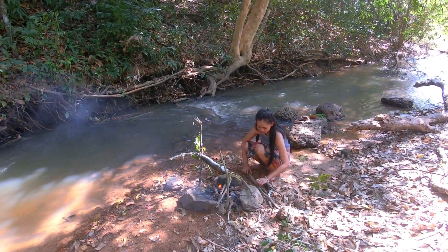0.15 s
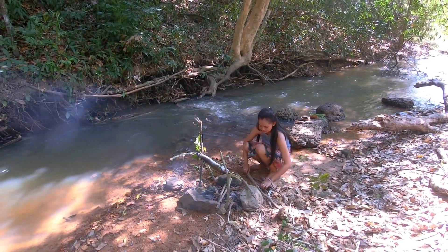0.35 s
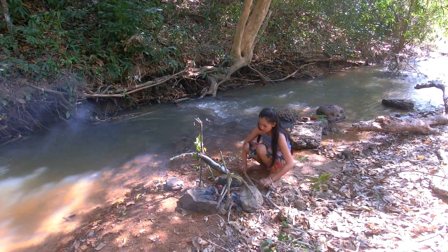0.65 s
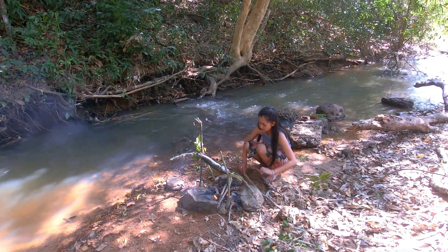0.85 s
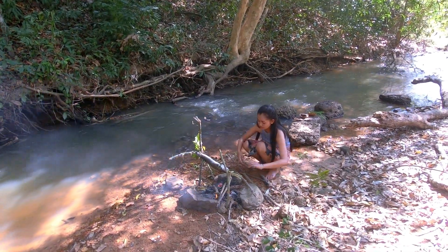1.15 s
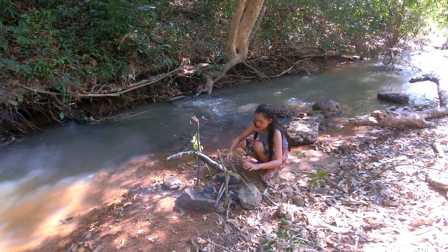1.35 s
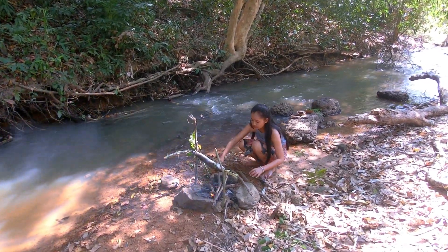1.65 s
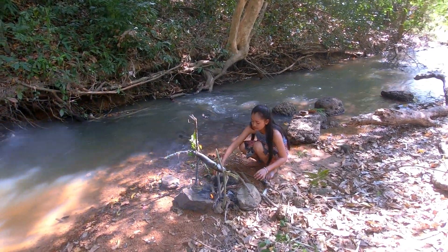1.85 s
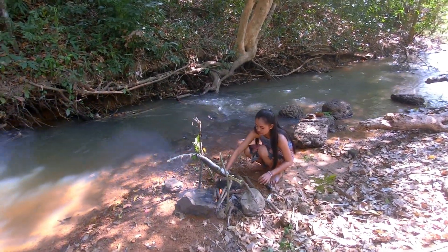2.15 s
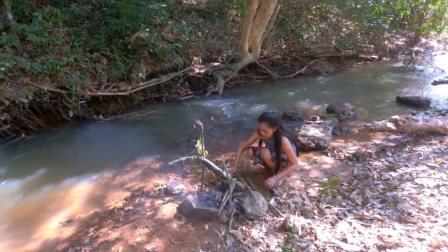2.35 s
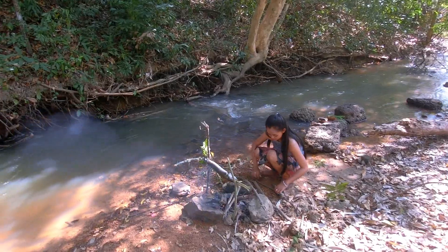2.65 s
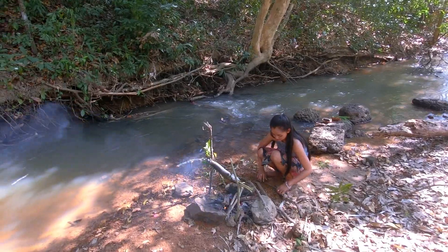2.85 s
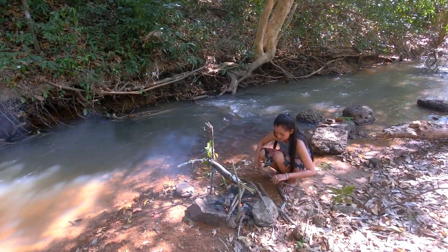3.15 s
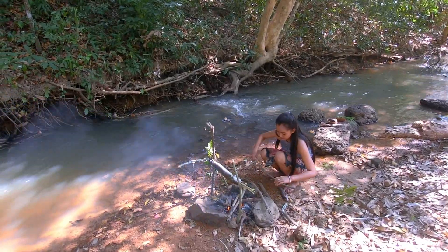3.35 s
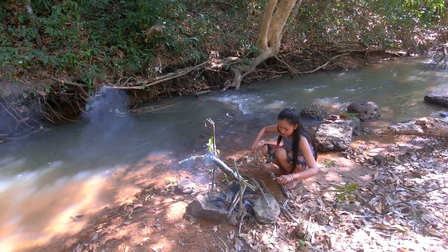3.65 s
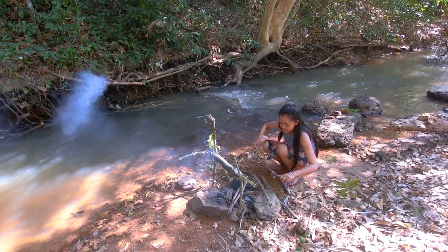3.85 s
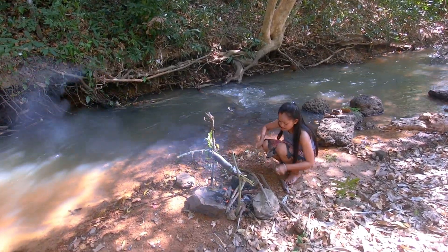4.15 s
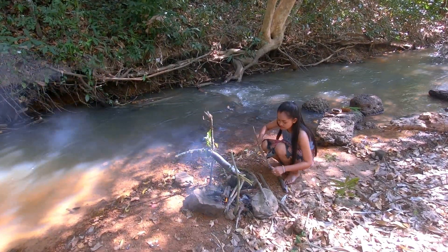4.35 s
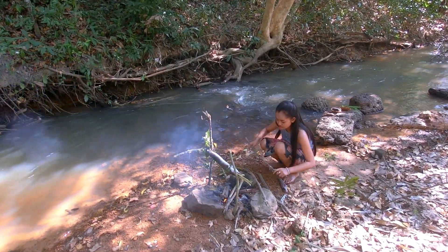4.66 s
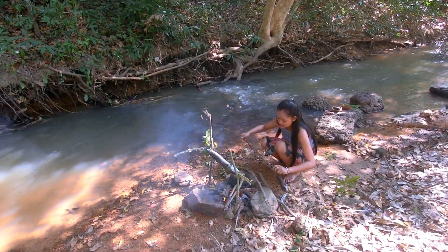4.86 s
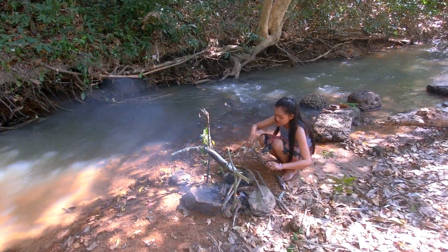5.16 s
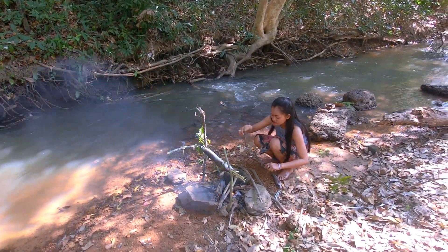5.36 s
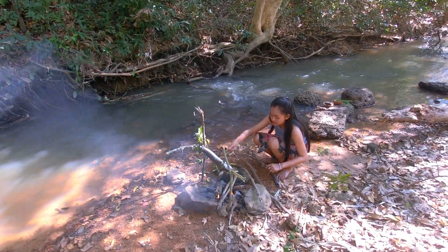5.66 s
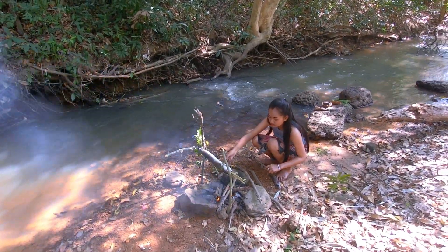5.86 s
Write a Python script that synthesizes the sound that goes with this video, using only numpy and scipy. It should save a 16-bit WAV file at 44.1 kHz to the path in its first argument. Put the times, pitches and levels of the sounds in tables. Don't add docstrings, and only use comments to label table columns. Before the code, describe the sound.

Forest stream bank, open air, stereo microphone near a small fire. Continuous turbulent water with gurgles and bright drips; a metallic-thin cicada buzz that repeatedly dips in pitch and rises again; distant insects hissing behind. Dry crackles get busier after three seconds, leading to a sharp crack and a louder double snap with a bright echo, then the background drops and slowly recovers. Soft low wind buffets.

```python
import sys
import numpy as np
from scipy import signal
from scipy.fft import rfft, irfft
from scipy.io import wavfile
from scipy.ndimage import uniform_filter1d

SR = 44100
rng = np.random.default_rng(int(sys.argv[2]) if len(sys.argv) > 2 else 0)


def boost(x):
    u = np.asarray(x, float) / 20
    return 10 ** u


def generate_wav(signal):
    frames = np.transpose(np.atleast_2d(signal))
    scaled = np.clip(frames, -1, 1) * 32767
    pcm = np.round(scaled).astype(np.int16)
    wavfile.write(sys.argv[1], SR, pcm)


N = 265041
TIME = np.arange(N) / SR

# (frequency [Hz], level [dB per Hz])
CREEK_SPECTRUM = [(120, -5), (228, -8), (410, -10), (825, -2), (1800, -2.5), (2900, -5), (4700, -7.5),
                  (9900, -11), (13000, -11), (17000, -22)]


def evened(x):
    return x / np.sqrt(np.mean(x ** 2) + 1e-20)


def read(points, hz):
    f, value = np.transpose(points)
    return np.interp(np.log(hz + 1), np.log(f + 1), value)


def add(mix, start_s, sound, pan_db):
    part = mix[:, round(start_s * SR):][:, :sound.shape[-1]]
    gain = boost(np.array([[pan_db], [-pan_db]]) / 2)
    part += (gain * sound)[:, :part.shape[1]]


def resonate(x, hz, width_hz):
    turn = np.exp(2j * np.pi * np.cumsum(hz * np.ones(N)) / SR)
    r = np.exp(-np.pi * width_hz / SR)
    return 2 * (turn * signal.lfilter([1 - r], [1, -r], x / turn)).real


def drift(rate_hz):
    return evened(np.interp(TIME * rate_hz, np.arange(1000), rng.standard_normal(1000)))


def ramp(from_s, length_s):
    return np.clip((TIME - from_s) / length_s, 0, 1)


def coloured(x, colour, size=1024):
    hz, t, z = signal.stft(x, SR, nperseg=size)
    z = z * boost(read(colour, hz))[:, None]
    return signal.istft(z, nperseg=size)[1][..., :N]


def echoed(x):
    # (frequency [Hz], t60 [s])
    banks_t60 = [(1000, 0.072), (3000, 0.11), (6000, 0.692), (12000, 0.41)]
    length = SR // 2
    sparse = (rng.random((2, length)) < .06) * (np.arange(length) > 150)
    taps = rng.choice([-1., 1.], (2, length)) * sparse
    hz, t, z = signal.stft(taps, SR, nperseg=256)
    decay = boost(-60 * t / read(banks_t60, hz)[:, None])
    tail = signal.istft(z * decay, nperseg=256)[1]
    return signal.fftconvolve(x, tail / np.linalg.norm(tail[0]), axes=1)[:, :N]


def creek():
    level_db = -43.5 + 0.19 * drift(3.26)
    return boost(level_db) * (creek_wash() + boost(-5.5) * bubble_swarm()) + single_bubbles()


def creek_wash():
    # (frequency [Hz], left-right likeness [0-1])
    likeness = [(100, 0.23), (270, 0.64), (450, 0.57), (740, 1), (1220, 0.79), (2000, 0.93), (3300, 0.63),
                (5500, 0.1), (11000, 0.21), (15000, 0.13)]
    # (frequency [Hz], left lead [rad])
    left_lead = [(100, .01), (1120, 0.63), (2670, 1), (3450, 0.21), (5000, 0.91), (10000, .1)]
    frames, hz = N // 128 + 5, np.fft.rfftfreq(512, 1 / SR)
    a, b, c, d, patches = rng.standard_normal((frames, 257, 5)).T
    patches = uniform_filter1d(patches, size=5, axis=0)
    patches = evened(uniform_filter1d(patches, size=16, axis=1))
    flicker = evened(uniform_filter1d(rng.standard_normal(frames), size=6))
    flicker = flicker * np.clip(hz / 9000, 0, 1)[:, None]
    same = np.clip(read(likeness, hz), -1, 1)[:, None]
    left = a + 1j * b
    right = same * left + np.sqrt(1 - same ** 2) * (c + 1j * d)
    right = right * np.exp(-1j * read(left_lead, hz))[:, None]
    level_db = read(CREEK_SPECTRUM, hz)[:, None] + 1.57 * patches + 0.83 * flicker
    z = np.array([left, boost(1.2) * right]) * boost(level_db)
    return evened(signal.istft(z, nperseg=512, noverlap=384)[1][:, :N])


def bubble(hz, turns, rise):
    u = np.arange(int(3 * turns * SR / hz)) * hz / SR / turns
    ring = np.sin(2 * np.pi * turns * (u + rise * u ** 2))
    return ring * np.exp(-2 * u) * np.minimum(u * 8, 1) * 1.348


def bubble_swarm():
    swarm = np.zeros((2, N))
    for hz in np.geomspace(330, 2600, num=18):
        per_s = 40 * boost(7 * drift(9))
        size_db = 3.5 * np.minimum(rng.exponential(1, N), 3)
        train = boost(size_db) * (rng.random(N) < per_s / SR)
        pan_db, turns = rng.standard_normal(2)
        sound = signal.oaconvolve(train, bubble(hz, 9 + turns, 0.0967))[:N]
        add(swarm, 0, boost(read(CREEK_SPECTRUM, hz)) * sound, 2.0 * pan_db - 0.5)
    return evened(swarm)


def single_bubbles():
    # (time [s], peak [dB], pitch [Hz])
    large_bubbles = [(0.124, -28.5, 1210), (0.139, -32, 544), (0.296, -33.5, 574), (0.234, -26, 1010),
                     (0.269, -31.5, 950), (0.349, -29.5, 870), (0.494, -33, 424), (0.64, -24.5, 1410),
                     (1.44, -31, 734), (0.867, -30.5, 600), (0.912, -36, 262), (1.905, -32, 1590),
                     (2.097, -31.5, 990), (2.533, -29.5, 940), (3.519, -38, 267), (3.367, -33, 450),
                     (2.693, -31, 1690), (2.749, -32, 1060), (2.845, -27.5, 820), (3.149, -29, 1090),
                     (3.428, -30, 1380), (3.509, -32, 1300), (3.778, -31, 580), (4.302, -31, 624),
                     (4.53, -40, 290), (4.779, -33, 349), (5.397, -29, 790), (5.45, -28.5, 840),
                     (5.844, -27.5, 805), (5.974, -33, 342.4)]
    # (time [s], peak [dB], pitch [Hz], pitch rise [fraction])
    bright_drips = [(0.2354, -30, 2735, 0.11), (0.4424, -29, 3700, 0.09), (1.427, -34.5, 2760, 0.1),
                    (1.9964, -33, 2580, 0.082), (2.1445, -28.5, 2510, 0.077), (3.2512, -30.5, 3420, 0.084),
                    (3.3667, -31, 2300, 0.086), (3.482, -30, 4750, 0.019), (3.4848, -31, 4730, .01),
                    (3.4885, -33, 4600, .01), (3.4915, -31, 4650, .01), (3.5018, -28, 4300, .02),
                    (3.862, -32, 4100, .05), (3.4982, -29, 4260, 0.05), (3.8496, -24.5, 3550, 0.15),
                    (4.4039, -33, 2040, 0.11), (4.653, -29, 3370, 0.11), (5.3185, -34, 2460, 0.092)]
    out = np.zeros((2, N))
    for s, db, hz in large_bubbles:
        add(out, s, boost(db - 5.5) * bubble(hz, 7.1, 0.0506), -1.)
    for s, db, hz, rise in bright_drips:
        add(out, s, boost(db - 2) * bubble(hz * (1 - rise), 7.8, rise), -1.5)
    return out


def cicada():
    # (level [dB], shift [click periods])
    ribs = [
        (1.5, 0),
        (-1, .004),
        (-5, -.003),
        (-7, .006),
        (-2.5, -.002),
    ]
    body_hz, clicks_per_s, effort_db = cicada_phrase()
    turns = np.cumsum(clicks_per_s + 1.1 * drift(7)) / SR
    count = np.arange(1, int(turns[-1]))
    rib_db, shift = np.transpose(ribs)[:, count % len(ribs)]
    chance = rng.standard_normal((3000, 2))[:len(count)]
    slack = np.clip((7700 - np.interp(count, turns, body_hz)) / 1400, 0, 1)
    jitter = (.003 + .011 * slack) * chance[:, 0]
    at = np.interp(count + shift + jitter, turns, np.arange(N))
    near = np.round(at).astype(int)[:, None] + np.arange(-8, 9)
    size = boost(rib_db + 2. * chance[:, 1])
    pulse = np.sinc(near - at[:, None]) * np.hanning(19)[1:-1]
    clicks = np.zeros(N + 9)
    np.add.at(clicks, near, size[:, None] * pulse)
    ring = clicks[:N]
    for _ in range(3):
        ring = resonate(ring, body_hz, 1400)
    ring = signal.sosfilt(signal.butter(6, 5650 / SR * 2, "high", output="sos"), ring)
    voice = evened(ring) * boost(effort_db + 0.63 * drift(25.4))
    hz, delay_s = np.fft.rfftfreq(N, 1 / SR), 62e-6
    late = irfft(rfft(voice) * np.exp(-2j * np.pi * hz * delay_s), N)
    pair = np.array([boost(0.2) * late, boost(2.0) * voice])
    return pair + boost(-4) * echoed(pair)


def cicada_phrase():
    # (from [s], to [s], lowest body pitch [Hz], slack click rate [1/s])
    dips = [
        (.5, 1.201, 6220, 445),
        (2.04, 2.72, 6500, 442),
        (3.57, 4.251, 6600, 437),
        (5.17, 5.879, 6430, 450),
    ]
    # (time [s], level [dB])
    effort_points = [(0, -45), (.5, -46.5), (.9, -45), (1.2, -45), (1.9, -45.5), (2.2, -47), (2.8, -45.5),
                     (3.05, -42.5), (3.55, -47.5), (4.1, -47), (4.3, -45.5), (4.6, -47), (5.15, -47),
                     (5.35, -50), (5.68, -44), (5.78, -50), (5.9, -43.5), (6.02, -44)]
    slacken_s, tighten_s, dip_db = 0.23, 0.17, -2.
    taut_hz, sag_hz_per_s, first_taut_s = 8070, 400, -0.301
    taut_per_s, rate_sag_per_s2, quicken_s, rate_lag_s = 421.1, 2.2, .18, .07
    taut_s = TIME - first_taut_s
    for start, end, low_hz, slack_per_s in dips:
        taut_s = np.where(TIME > (start + end) / 2, np.maximum(TIME - end, 0), taut_s)
    body_hz = taut_hz - sag_hz_per_s * taut_s
    clicks_per_s = taut_per_s - rate_sag_per_s2 * taut_s
    effort_db = np.interp(TIME, *np.transpose(effort_points))
    for start, end, low_hz, slack_per_s in dips:
        slack = ramp(start, slacken_s) - ramp(end - tighten_s, tighten_s)
        quick = ramp(start, quicken_s) - ramp(end + rate_lag_s - quicken_s, quicken_s)
        body_hz = body_hz + slack * (low_hz - body_hz)
        clicks_per_s = clicks_per_s + quick * (slack_per_s - clicks_per_s)
        effort_db = effort_db + dip_db * slack
    return body_hz, clicks_per_s, effort_db


def band(low_hz, high_hz):
    return signal.butter(2, [low_hz / SR * 2, high_hz / SR * 2], "band")


def fire():
    return fire_crackle() + fire_snaps()


def fire_crackle():
    # (time [s], peak [dB], left-right [dB], low part [dB])
    ticks = [(0.1411, -29, -0.5, -5), (0.6632, -26, -6, -2), (0.9118, -28, -4, 8),
             (1.1134, -38, -0.5, -8.0), (1.276, -28.5, -0.5, 7), (1.6177, -22, -4, 0),
             (2.0368, -34, 0.0, -8.0), (2.2717, -45, 0.0, -8.0), (2.4159, -40, -1.0, -11),
             (2.6469, -29, 0.0, -0.5), (2.9352, -27, -1.5, -9), (3.0789, -39, -1.0, -8.0),
             (3.1774, -26, 0.0, -8.0), (3.3354, -22.5, -0.5, 2.5), (3.4995, -25, -2.0, 10.5),
             (3.5818, -41, 0.0, -8.0), (3.7134, -23.5, -4, 5), (3.7893, -32, -1.5, -3),
             (3.8086, -30, -3.5, -3), (3.9625, -25, 0.0, 0), (4.7122, -47, -1.0, -11),
             (5.1173, -36, 0.0, -8.0), (5.2924, -35, 0.0, -8.0), (5.5343, -41, -0.5, -8.0),
             (5.5947, -42, -1.0, -8.0), (3.73, -32, -1, 5), (5.7254, -29, -0.5, -5),
             (5.8366, -30, -1.0, -8.0)]
    out, t = np.zeros((2, N)), TIME[:2000]
    bright, body = band(7000, 14500), band(2000, 9000)
    envelope = boost(-60 * t / 0.0065) + boost(-8 - 60 * t / 0.027)
    envelope = envelope * np.minimum(t / 0.00029, 1)
    for s, db, pan_db, low_db in ticks:
        burst = rng.standard_normal(2000) * envelope
        tick = signal.lfilter(*bright, burst) + boost(low_db - 5.5) * signal.lfilter(*body, burst)
        add(out, s + .0008, boost(db - 2.5) * tick, pan_db)
    size_db = 4 * np.minimum(rng.exponential(1, N), 2.5)
    fizz = boost(size_db) * (rng.random(N) < 90 / SR) * rng.choice([-1, 1], N)
    return out + boost(-31.5) * signal.lfilter(*bright, fizz)


def fire_snaps():
    snaps = [
        ((3.8316, -4, -3, -36, -20, .0002), [(3000, -25, .003), (5200, -21, .003), (7600, -7, .003), (9600, -1, .0025), (11600, -1, .0025), (13900, -4, .002)]),
        ((4.0552, 5.5, -1, -15, -15, .0005), [(1700, -27, .008), (2750, -17, .011), (3600, -15, .009), (4700, -16, .008), (5400, -13, .006), (6500, -5, .006), (8000, -4, .005), (8900, -10, .004), (9800, 2, .0045), (10800, -8, .003), (12300, -9, .003), (14400, -12, .004)]),
        ((4.0671, 3.5, -1, -15, -14, .0006), [(1500, -25, .006), (3500, -16, .005), (5500, -12, .005), (7500, -1, .006), (8300, -7, .005), (9400, -4, .004), (11800, -17, .035), (12100, -1, .006), (14300, -9, .006)]),
    ]
    # (frequency [Hz], level [dB])
    echo_colour = [(500, -38), (2000, 1), (4000, -3), (7000, -2.5), (12000, 3.5), (15000, -6),
                   (18000, -20.5)]
    out, cracks, t = np.zeros((2, N)), np.zeros((2, N)), TIME[:2000]
    splinters = band(4500, 15000)
    for (s, db, pan_db, echo_db, grit_db, rise_s), modes in snaps:
        phase, grit = rng.standard_normal((2, 2, 2000))
        ring = np.zeros((2, 2000))
        for k, (hz, mode_db, t60_s) in enumerate(modes):
            angle = 2 * np.pi * hz * t + np.pi * k + .25 * phase[:, [k]]
            ring += boost(mode_db - 60 * t / t60_s) * np.sin(angle)
        ring += boost(grit_db - 60 * t / .02) * signal.lfilter(*splinters, grit + 1.5 * grit[0])
        ring = ring * np.minimum(t / rise_s, 1) ** 2
        add(out, s, boost(db) * ring / abs(ring).max(), pan_db)
        add(cracks, s, boost(echo_db + 21) * np.ones(1), pan_db)
    return out + coloured(echoed(cracks), echo_colour, size=256)


def wind():
    # (time [s], peak [dB], left-right [dB], time to fall 10 dB [s])
    gusts = [(0.03, -54, 0, .15), (.2, -45.5, 1, 0.0963), (.35, -46, -1, .04), (.44, -45.5, 0, .06),
             (.54, -46, -14, 0.08), (.99, -59.5, 1, 0.2), (1.63, -49.5, -11.5, .08), (2.24, -54, -12, .07),
             (2.34, -52, -13, 0.24), (2.46, -47, -15, 0.0372), (2.84, -52, 12, .04),
             (2.955, -48, -12.5, 0.02), (3.16, -48.5, -13, 0.05), (3.25, -49, -12, .1),
             (3.335, -35.5, -3, 0.01), (3.42, -39.5, -2, .08), (3.56, -55, -14, 0.3),
             (3.715, -36.5, -4, 0.09), (3.79, -42, -7, 0.1), (4.02, -43, -6, 0.1046), (4.3, -47.5, 6, .07),
             (4.42, -50.5, 6, 0.1), (4.85, -50.5, -10, 0.17), (5.04, -49, 8, .1), (5.25, -56, -2, 0.4),
             (5.39, -47.5, -9, 0.1), (5.49, -45, 2, .1), (5.63, -49, -2, 0.2), (5.77, -43, 5, 0.1),
             (5.88, -51, 5, .1)]
    # (frequency [Hz], level [dB per Hz])
    wind_colour = [(8, -33), (20, -0.5), (38, -1.5), (70, -2), (110, -10), (160, -22), (260, -29),
                   (500, -49)]
    lull_db, lull_pan_db = -62, -4
    side = np.array([[.5], [-.5]])
    gust_power = boost(lull_db + lull_pan_db * side) ** 2 * np.ones(N)
    for s, db, pan_db, fall_s in gusts:
        gust_db = db + np.clip(pan_db, -15, 15) * side - 10 * abs(TIME - s) / fall_s
        gust_power = gust_power + boost(gust_db) ** 2
    lumps = rng.standard_normal((2, N)) * boost(2.2 * np.array([drift(22), drift(22)]))
    return evened(coloured(lumps, wind_colour, size=4096)) * boost(4.5) * np.sqrt(gust_power)


def chorus():
    # (frequency [Hz], width [Hz], level [dB], share common to both ports [0-1])
    far_insects = [
        (3431, 120, -55, 0),
        (6220, 920, -53, 0),
        (7170, 930, -57, 0.37),
        (8120, 2600, -47, 0),
    ]
    out = np.zeros((2, N))
    for hz, width_hz, db, same in far_insects:
        noise = rng.standard_normal((2, N))
        noise = noise + same * noise[::-1]
        fuzz = resonate(resonate(noise, hz, width_hz), hz, width_hz)
        out += boost(db + .9 * drift(6.5)) * evened(fuzz)
    return out


def scene():
    return creek() + cicada() + fire() + wind() + chorus()


def gain_control(dry):
    rest_db, duck_at_s, duck_db, duck_fall_s, recover_db_per_s = -1.13, 4.058, -10, 0.034, 4
    since_s = np.maximum(TIME - duck_at_s, 0)
    gain_db = rest_db + duck_db * (1 - np.exp(-since_s / duck_fall_s)) + recover_db_per_s * since_s
    return np.clip(dry * boost(gain_db), -1, 1)


def limit_treble(x):
    # (from [s], to [s])
    joined_spells = [(.54, .61), (.905, 1.045), (2.04, 2.14), (2.265, 2.375), (2.585, 2.925),
                     (3.185, 3.335), (3.535, 3.665), (3.86, 4.04), (4.085, 4.49)]
    join_hz, quiet_top_hz, loud_top_hz = 4650, 15300, 16450
    hz, t, z = signal.stft(x, SR, nperseg=1024)
    mid = z.mean(0)
    band_power = uniform_filter1d(abs(np.array([*z, mid])) ** 2, size=9, axis=1) + 1e-20
    shared = mid * np.sqrt(band_power[:2].mean(0) / band_power[2])
    escapes = np.repeat(rng.random((57, len(t))) < .1, 9, axis=0)
    in_spell = sum((t > a) & (t < b) for a, b in joined_spells)
    joined = in_spell * (hz > join_hz)[:, None] * ~escapes
    top = band_power[2][(hz > quiet_top_hz) & (hz < loud_top_hz)].mean(0)
    ragged_hz = quiet_top_hz + 900 * (uniform_filter1d(rng.random(len(t)), size=4) - .55)
    kept = hz[:, None] < np.where(top > 60 * np.median(top), loud_top_hz, ragged_hz)
    return signal.istft(np.where(joined, shared, z) * kept, nperseg=1024)[1][:, :N]


def top_cut(x):
    return signal.sosfilt(signal.butter(12, 16540, fs=SR, output="sos"), x)


def record(dry):
    x = gain_control(dry)
    x = x - .8 * resonate(x, 11700, 90)
    return top_cut(limit_treble(x))


dry = scene()
out = record(dry)
generate_wav(out)
```